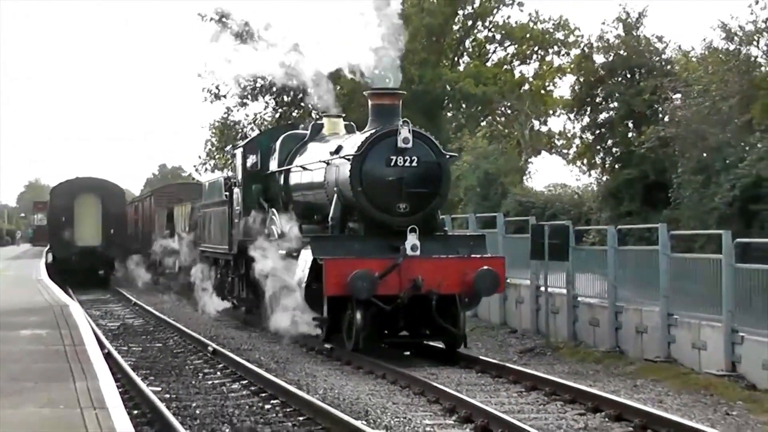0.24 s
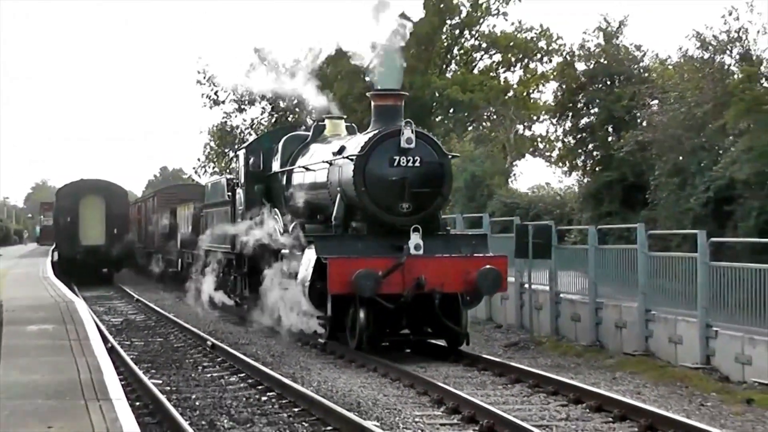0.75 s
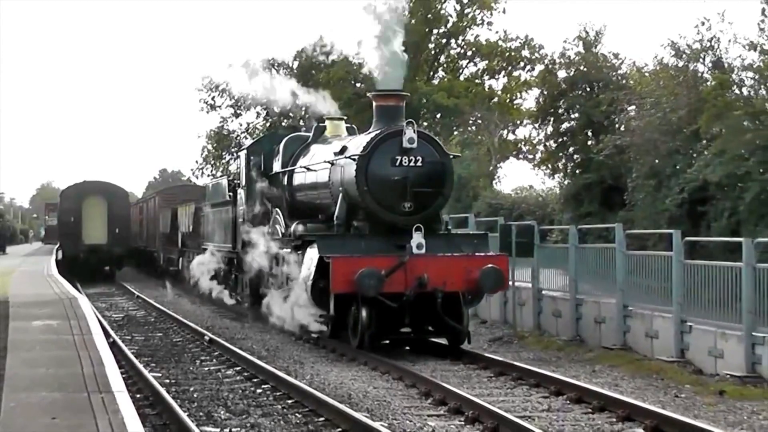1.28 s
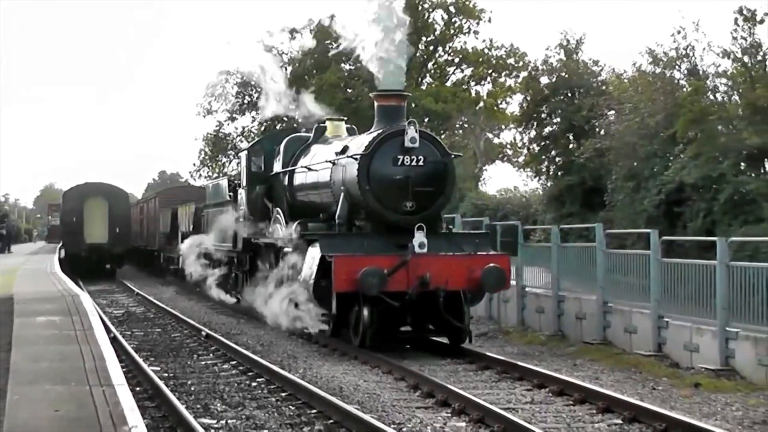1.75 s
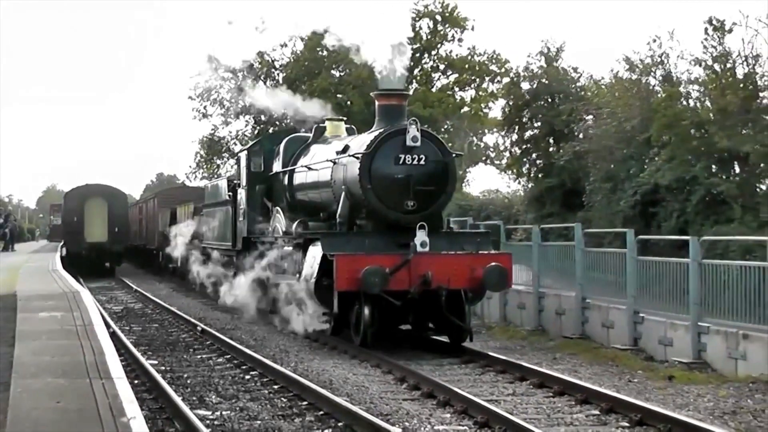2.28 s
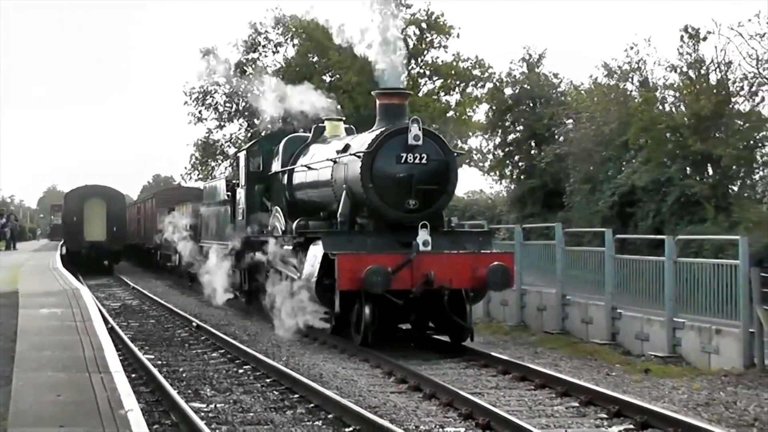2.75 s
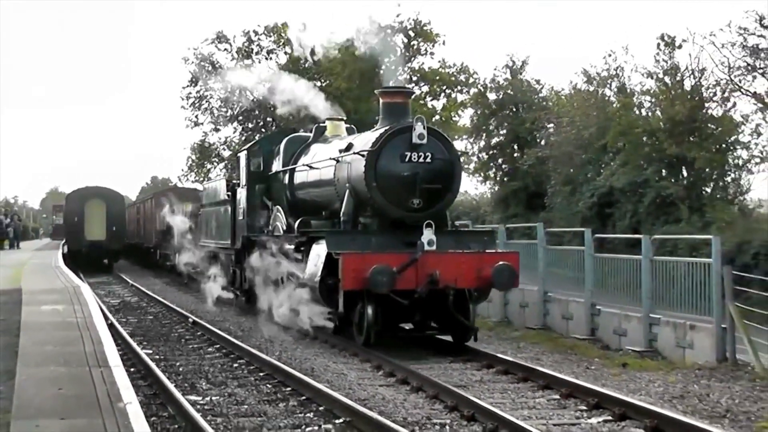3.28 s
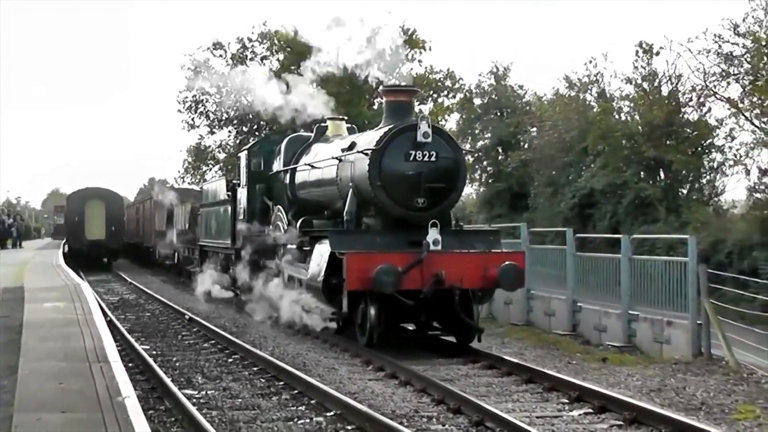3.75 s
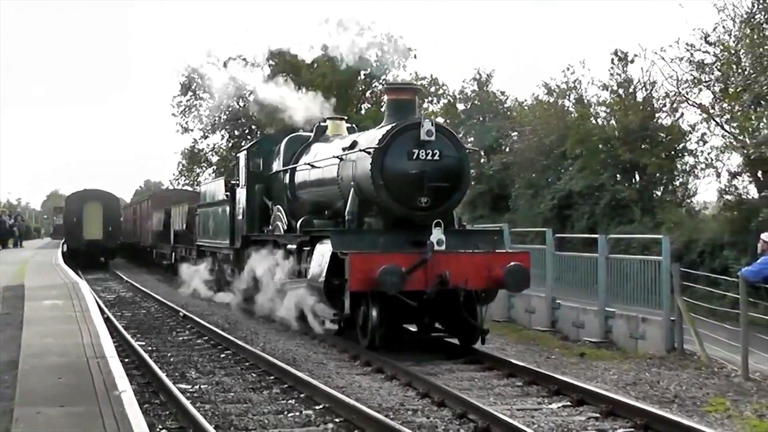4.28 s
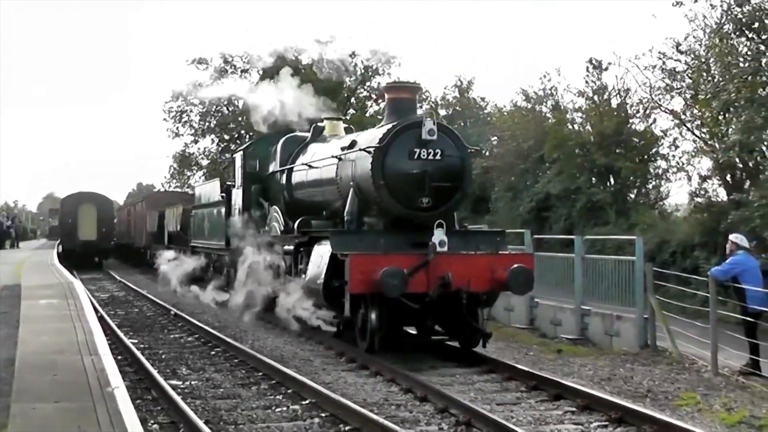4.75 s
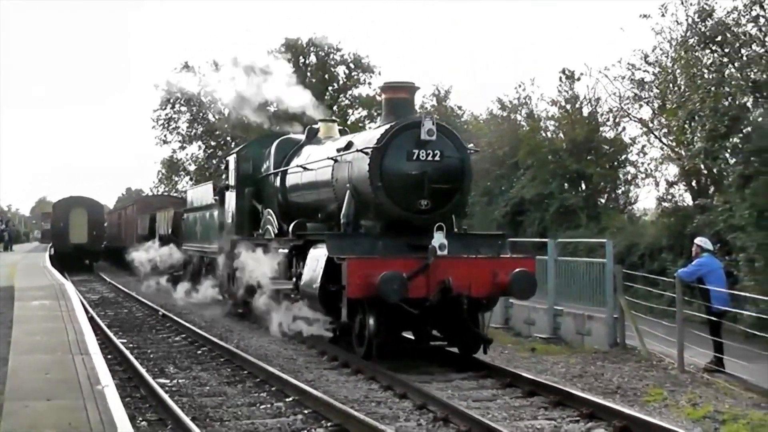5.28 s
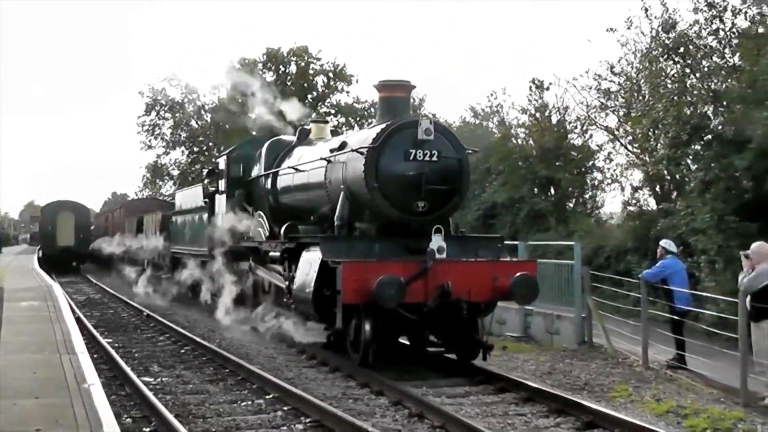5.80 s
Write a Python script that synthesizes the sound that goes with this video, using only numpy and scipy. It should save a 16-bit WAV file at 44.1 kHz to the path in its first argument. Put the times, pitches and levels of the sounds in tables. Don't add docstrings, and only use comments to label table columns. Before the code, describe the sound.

Outdoors beside a station platform, a steam locomotive blasts a loud, steady, slightly whistling jet that masks nearly everything. It shuts off suddenly after about two seconds. Then slow, deep exhaust beats emerge, with wet hissing drains, rod knocks and wheel thuds building over a low rumble. One camera microphone, almost mono, with the background rising once the jet stops.

```python
import sys
import numpy as np
from scipy import signal
from scipy.fft import rfft, irfft, next_fast_len
from scipy.io import wavfile
from scipy.ndimage import uniform_filter1d, map_coordinates

SR = 44100
rng = np.random.default_rng(int(sys.argv[2]) if len(sys.argv) > 2 else 0)


def magnitude_from_level(level_db):
    exponent = np.asarray(level_db, float) / 20
    return 10 ** exponent


def unload_audio(sound):
    columns = np.transpose(np.atleast_2d(sound))
    steps = np.round(np.clip(columns, -1, 1) * 32767)
    wavfile.write(sys.argv[1], SR, steps.astype(np.int16))


N = 265922
T = np.arange(N) / SR
FFT_SIZE = next_fast_len(N)
SHUT_S = 2.352


def unit(x):
    return x / np.sqrt(np.mean(x ** 2) + 1e-20)


def curve(rows):
    s, db = np.transpose(rows)
    return np.interp(T, s, db, right=-120)


def wobble(rate_hz):
    return map_coordinates(rng.standard_normal(int(N * rate_hz / SR) + 4), [T * rate_hz])


def swell(s, rise_s, fall_s):
    return np.exp(-((T - s) / np.where(T < s, rise_s, fall_s)) ** 2)


def rush(spectrum, modes=(), patchy_db=1.0, patch_frames=10):
    z = signal.stft(rng.standard_normal(N + 512), nperseg=512)[2]
    patches = uniform_filter1d(rng.standard_normal(z.shape), size=5, axis=0)
    patches = uniform_filter1d(patches, size=patch_frames, axis=1)
    noise = signal.istft(z * magnitude_from_level(patchy_db * unit(patches)), nperseg=512)[1][:N]

    hz = np.fft.rfftfreq(FFT_SIZE, 1 / SR)
    f, db = np.transpose(spectrum)
    colour_db = np.interp(np.log(hz + 1), np.log(f + 1), db)
    for centre_hz, width_hz, top_db in modes:
        skewed_hz = np.where(hz > centre_hz, 3.04 * width_hz, width_hz)
        colour_db = colour_db + top_db / (1 + (2 * (hz - centre_hz) / skewed_hz) ** 2)
    return unit(irfft(rfft(noise, FFT_SIZE) * magnitude_from_level(colour_db), FFT_SIZE)[:N])


def ducking_db():
    duck_db, recover_s = -6.5, 0.084
    return duck_db * np.exp(-np.maximum(T - SHUT_S - .1, 0) / recover_s)


# time in seconds, flow in dB.
JET_FLOW = [(0, -26), (.4, -26.5), (.75, -27), (1.0, -27.5), (1.3, -26.5), (1.7, -26), (2.35, -27),
            (6.03, -26.2)]
# frequency in Hz, level in dB per Hz.
JET_COLOUR = [(240, -25), (400, -5), (677, -12), (900, -0.5), (1110, -2.5), (1270, -2), (2140, -6),
              (2370, -5), (4370, -5), (12000, -27.5), (15600, -60), (22000, -120)]
# centre in Hz, width in Hz, lift in dB.
CHIMNEY = [(732, 41, 10), (854, 84, 4.5), (973, 14, 4), (1260, 38, 9.5), (1476, 92, 4.5), (1664, 54, 9.5),
           (2083, 85, 12.5), (2540, 82, 13), (2970, 51, 11), (3150, 60, 5), (3702, 33, 10.5),
           (3960, 195, 7), (4360, 95, 9.5), (4974, 180, 9), (5330, 62, 9), (6510, 330, 10),
           (6480, 100, 3.5), (7200, 130, 10.5), (7960, 200, 11.5), (8400, 60, 0), (670, 25, -3),
           (1074, 48, -5.5), (2000, 46, -6), (2410, 60, -10), (2810, 50, -3.5), (5300, 46, -16)]
# centre in Hz, width in Hz, lift in dB.
FAR_MODES = [(1675, 60, 3.5), (2110, 60, 2.5), (4800, 100, 3.5), (736, 29, 1.5)]
# centre in Hz, width in Hz, lift in dB.
NEAR_MODES = [(1385, 93, 4), (900, 50, 1.5), (1700, 37, -6.5), (3700, 80, 4), (4950, 150, -0.5)]


def jet():
    low_far_db, low_near_db, low_surge_db, surge_s = 1, 2.8, 2.5, .06
    shut_t60_s = 0.19
    level_db = curve(JET_FLOW) - 60 * np.maximum(T - SHUT_S, 0) / shut_t60_s
    low_db = low_far_db + (low_near_db - low_far_db) * T / SHUT_S
    low_db += low_surge_db * swell(SHUT_S + .03, surge_s, 1)

    far = rush(JET_COLOUR, CHIMNEY + FAR_MODES, patchy_db=1.3, patch_frames=14)
    near = rush(JET_COLOUR, CHIMNEY + NEAR_MODES, patchy_db=1.3, patch_frames=14)
    nearness = np.clip(T / 2.26, 0, 1) * np.pi / 2
    steam = np.cos(nearness) * far + np.sin(nearness) * near
    low = signal.sosfiltfilt(signal.butter(2, [720, 1080], "band", fs=SR, output="sos"), steam)
    flow = magnitude_from_level(low_db + 0.53 * wobble(12.54)) * low + magnitude_from_level(0.4 * wobble(8.45)) * (steam - low)
    return magnitude_from_level(level_db + 2.5 + 0.22 * wobble(60.6) + 0.63 * wobble(900)) * flow


# time in seconds, steam flow in dB.
DRAIN_FLOW = [(0, -48), (.37, -44.5), (1.07, -49), (1.2, -43), (1.8, -49), (1.95, -43), (2.41, -50),
              (2.6, -36), (3.0, -35.5), (3.22, -31.5), (3.45, -35.5), (3.6, -30), (3.65, -29), (4.7, -27),
              (4.9, -30), (5.4, -33), (5.72, -28), (6.03, -28.5)]
# frequency in Hz, level in dB per Hz.
DRAIN_COLOUR = [(1350, -22), (2300, -12.5), (2600, -6.5), (3980, -3.5), (5320, -2.5), (5910, -6),
                (6510, -1), (10700, -10), (14500, -21.5), (15800, -28)]
# centre in Hz, width in Hz, lift in dB.
NOZZLE = [(3600, 200, 2.5), (4400, 360, 3.5), (5340, 370, 4.5), (5900, 370, 0.5)]


def drains():
    even_flow_db, dull_per_db = -35, .5
    puff_db, puff_per_db = 3.5, 0.48
    puff_lead_s, puff_rise_s, puff_fall_s = 0.034, .025, 0.056
    level_db = curve(DRAIN_FLOW)
    puffs = sum(swell(beat[0] - puff_lead_s, puff_rise_s, puff_fall_s) for beat in BEATS)
    level_db = level_db + (puff_db + puff_per_db * (even_flow_db - level_db)) * puffs
    dull_db = dull_per_db * (even_flow_db - level_db)

    flutter_db = .35 * wobble(9) + 0.31 * wobble(18) + 0.45 * wobble(70) + 0.7 * wobble(1500)
    body = magnitude_from_level(dull_db + 6.5) * rush(DRAIN_COLOUR, NOZZLE, patchy_db=1.08)
    fizz = magnitude_from_level(-4.5) * rush([(5000, -48), (8000, -2.0), (11000, 1), (15900, -10)], patchy_db=1.5)
    return magnitude_from_level(level_db + flutter_db) * (body + fizz)


# time in seconds, load on the rails in dB.
TRAIN_LOAD = [(0, -61), (1, -54.5), (2.1, -53), (2.45, -48), (2.94, -41), (3.3, -41), (3.55, -43.5),
              (3.9, -51), (4.0, -34.5), (4.3, -31.5), (4.5, -32), (4.62, -38), (4.82, -39), (4.9, -27),
              (5.12, -26), (5.25, -33.5), (5.45, -30), (6.03, -27.5)]
# frequency in Hz, level in dB per Hz.
RUMBLE = [(15, -50), (30, -42), (60, -7), (100, 2.5), (140, 4.5), (190, -4.5), (280, -2), (400, -23),
          (900, -120)]
# frequency in Hz, level in dB per Hz.
CLATTER = [(170, -5), (240, -3), (330, -4.5), (400, -8), (550, -4), (720, -12.5), (1000, -18.5),
           (1600, -52)]
# frequency in Hz, level in dB per Hz.
ROAR = [(180, -39), (300, -21), (655, -7), (883, -7.5), (1130, -3.5), (1300, -2.5), (2340, -6.5),
        (3500, -20), (4550, -40), (7700, -120)]
# centre in Hz, width in Hz, lift in dB.
FRAME = [(560, 64, 10.5), (874, 78, 10), (1286, 220, 7), (1754, 130, 4), (2165, 83, 9.5), (1076, 60, -5.5),
         (2286, 89, -12)]


def train():
    clatter_db, clatter_grows = -44.5, 0.51
    roar_db, roar_grows, nearing_db_per_s = -39.5, 0.082, 0.6
    jet_shakes_db, beat_shakes_db, thud_shakes_db = 12.5, -10, -22
    shake_s, beat_push_db = 0.049, -4.5
    load_db = curve(TRAIN_LOAD)
    over_db = load_db + 45

    beaten = sum(magnitude_from_level(row[3]) * swell(row[0], shake_s, shake_s) for row in BEATS)
    thudded = sum(magnitude_from_level(row[1] + thud_shakes_db) * swell(row[0], shake_s / 2, shake_s) for row in THUDS)
    shaken = magnitude_from_level(beat_shakes_db) * beaten + thudded

    rumble = unit(magnitude_from_level(0.79 * wobble(8) + 0.52 * wobble(25)) * rush(RUMBLE, patchy_db=0.3))
    clatter = unit(magnitude_from_level(0.94 * wobble(30)) * rush(CLATTER, patchy_db=2.8))
    roar = unit(magnitude_from_level(0.94 * wobble(6.14) + 0.44 * wobble(21.7)) * rush(ROAR, FRAME, patchy_db=1.0))

    clatter_db = clatter_db + clatter_grows * over_db + ducking_db() + jet_shakes_db * (T < SHUT_S)
    roar_db = roar_db + roar_grows * over_db + ducking_db() + nearing_db_per_s * (T - SHUT_S)
    rumble_gain = magnitude_from_level(load_db + 0.9) + magnitude_from_level(beat_push_db) * beaten
    return rumble_gain * rumble + (magnitude_from_level(clatter_db) + shaken) * clatter + magnitude_from_level(roar_db) * roar


# peak time in seconds, peak in dB.
KNOCKS = [
    (0.373, -32),
    (2.175, -24),
    (2.329, -23),
    (3.743, -23),
    (5.282, -12.5),
]
# peak time in seconds, peak in dB, pitch in Hz.
THUDS = [(3.185, -27, 171), (4.029, -30, 199), (4.073, -31, 185), (4.116, -29, 260), (4.188, -21, 273),
         (4.28, -29, 117), (4.318, -28, 263), (4.345, -17.5, 261), (4.428, -17, 275), (4.479, -25, 113),
         (4.826, -14.5, 280), (4.853, -13.5, 231), (4.878, -19.5, 205), (4.905, -17.5, 185),
         (4.951, -12.5, 274), (5.016, -21, 262), (5.055, -28, 143), (5.094, -20, 123), (5.104, -16, 257),
         (5.265, -17, 281), (5.394, -16.5, 260), (5.524, -17.5, 110), (5.643, -16, 293), (5.685, -24, 123),
         (5.706, -18.5, 286), (5.865, -15.5, 270), (5.909, -16.5, 260), (5.928, -17.5, 212),
         (5.981, -15.5, 282), (5.983, -19, 138)]
# frequency in Hz, level in dB per Hz.
BARK = [(200, -37), (330, 6.5), (480, 2), (700, -13.5), (900, -2), (1300, -11), (1800, -7), (2200, -35),
        (3500, -60)]


def knocks_and_thuds():
    knock_hz, knock_cycles, thud_cycles = 143, 0.95, 1.77
    out = np.zeros(N)
    rattle = rush(BARK, patchy_db=3)
    contacts = [(s, db, knock_hz, knock_cycles) for s, db in KNOCKS]
    contacts += [(s, db, hz, thud_cycles) for s, db, hz in THUDS]
    for s, db, hz, cycles in contacts:
        phase = rng.uniform(0, 2 * np.pi)
        near = slice(round((s - .06) * SR), round((s + .1) * SR))
        t = T[near] - s
        half_s = cycles / hz
        ring = np.cos(2 * np.pi * hz * t * (1 - 2.2 * t) + phase) + magnitude_from_level(-20.0) * rattle[near]
        out[near] += magnitude_from_level(db) * np.exp(-(t / np.where(t < 0, half_s, 1.07 * half_s)) ** 2) * ring
    return out


# time in seconds, level in dB, pitch in Hz, half length in seconds.
SQUEAKS = [(0.397, -30, 4700, .065), (0.783, -28, 4280, 0.056), (0.816, -30, 3910, .04),
           (1.2, -29.5, 4500, .05), (1.6, -30, 4490, 0.054), (1.994, -30, 4420, 0.053),
           (2.248, -31, 934, 0.037), (2.37, -31.5, 900, 0.035), (5.44, -38, 925, 0.11),
           (5.533, -27, 5070, 0.017), (5.54, -33.5, 1414, 0.037)]


def squeaks():
    out = np.zeros(N)
    for s, db, hz, half_s in SQUEAKS:
        width_hz = 3 * np.sqrt(hz)
        slow = wobble(width_hz) + 1j * wobble(width_hz)
        out += magnitude_from_level(db) * swell(s, half_s, half_s) * np.real(slow * np.exp(2j * np.pi * hz * T))
    return out


# time in seconds, boom in dB, length in seconds, bark in dB, bark lead in seconds.
BEATS = [
    (0.668, -28.5, 0.026, -35, .02),
    (1.55, -33, 0.049, -40.5, 0.016),
    (2.338, -34.5, 0.027, -35.5, .022),
    (3.132, -28.5, 0.043, -29.5, 0.001),
    (3.991, -27.5, 0.026, -28, 0.034),
    (4.728, -22.5, 0.035, -31.5, 0.0093),
    (5.438, -15, 0.036, -30.5, 0.018),
]


def exhaust():
    boom_hz = 189.7
    out = np.zeros(N)
    bark = rush(BARK, FRAME, patchy_db=2.2)
    push = rush([(30, -30), (70, -18), (140, -2.0), (300, 7.5), (500, -32)], patchy_db=5.0)
    slow = wobble(90) + 1j * wobble(90)
    boom = np.real((1 + 0.37 * slow) * np.exp(2j * np.pi * boom_hz * T)) + magnitude_from_level(-10) * push
    for s, boom_db, length_s, bark_db, lead_s in BEATS:
        out += magnitude_from_level(boom_db + 1.5) * swell(s, length_s, length_s) * boom
        out += magnitude_from_level(bark_db) * np.exp(-np.abs((T - s + lead_s) / (1.3 * length_s)) ** 4) * bark
    return out


# time in seconds, peak in dB, rise in seconds (60 dB), t60 in seconds, slap in dB.
SPURTS = [(1.2, -29, .05, 0.18, -30), (2.178, -24, .02, 0.099, -20), (3.63, -25, .03, 0.66, -28),
          (3.738, -16, 0.011, 0.042, -11.5), (3.746, -23, .01, 0.11, -16), (4.08, -27, .04, 0.13, -30),
          (4.5, -26.5, .3, 1.5, -31), (4.69, -19.5, .06, .1, -24), (5.278, -14, .0015, 0.043, -10),
          (5.288, -21, 0.018, 0.11, -18), (5.395, -35, .04, 0.19, -13), (5.53, -26, 0.11, .15, -6)]
# frequency in Hz, level in dB per Hz.
SPURT_COLOUR = [(2000, -50), (2900, -10), (4300, -1.5), (5300, -3.5), (7000, -5.5), (9000, -6.5),
                (15800, -29)]
# frequency in Hz, level in dB per Hz.
SLAP = [(400, -30), (700, -21), (1200, 0), (2000, 2), (3200, -2), (4500, -40)]


def spurts():
    out = np.zeros(N)
    spit = rush(SPURT_COLOUR, NOZZLE, patchy_db=0.8)
    slap = rush(SLAP, patchy_db=3)
    for s, db, rise_s, t60_s, slap_db in SPURTS:
        level_db = db - 60 * np.abs(T - s) / np.where(T > s, t60_s, rise_s)
        out += magnitude_from_level(level_db) * (spit + magnitude_from_level(slap_db) * slap)
    return out


# frequency in Hz, level in dB per Hz.
MIC_FLOOR = [(30, -24), (60, -5), (120, -2), (200, -1), (330, -15), (1000, -43), (15000, -46)]


def mic_floor():
    return magnitude_from_level(-44.5 + ducking_db()) * rush(MIC_FLOOR)


def scene():
    mono = jet() + drains() + train() + knocks_and_thuds() + squeaks() + exhaust() + spurts() + mic_floor()
    return np.array([mono, mono])


def limited(x):
    limit_db, squeeze, release_s = -20.5, 0.79, 0.041
    power = np.abs(uniform_filter1d(x[0] ** 2, size=600, origin=299))
    over_db = np.maximum(10 * np.log10(power + 1e-12) - limit_db, 0)
    keep = np.exp(-1 / (release_s * SR))
    return x * magnitude_from_level(-squeeze * signal.lfilter([1 - keep], [1, -keep], over_db))


# time in seconds, centre in Hz.
EAR_PATCHES = [(.069, 5150), (1.531, 10300), (1.624, 7600), (1.624, 11000), (2.07, 15000), (2.135, 7040),
               (2.135, 15000), (2.553, 4600), (2.553, 9600), (3.529, 10300), (3.784, 4600), (4.365, 7000),
               (4.365, 15000), (4.526, 6240), (4.713, 8400), (4.992, 9600), (4.992, 13700), (5.224, 6100),
               (5.224, 7000), (5.224, 8200), (5.363, 5800), (5.363, 9600), (5.363, 12500)]


def ear_patches(heard):
    other = np.roll(heard[0], SR // 20)
    side = np.zeros(N)
    for s, hz in EAR_PATCHES:
        near = slice(round(s * SR) - 700, round(s * SR) + 700)
        band = signal.butter(6, [hz - 660, hz + 660], "band", fs=SR, output="sos")
        side[near] += np.hanning(1400) * signal.sosfiltfilt(band, other[near])
    return magnitude_from_level(-2.5) * np.array([side, -side])


def low_pass(x):
    return signal.sosfilt(signal.butter(12, 15950, fs=SR, output="sos"), x)


def record(dry):
    heard = signal.sosfilt(signal.butter(2, 55, "high", fs=SR, output="sos"), limited(dry))
    heard = signal.fftconvolve(heard, [signal.firwin(1601, 15735, fs=SR)], "same", axes=1)
    heard = heard + ear_patches(heard)
    return low_pass(heard)


dry = scene()
out = record(dry)
unload_audio(out)
```